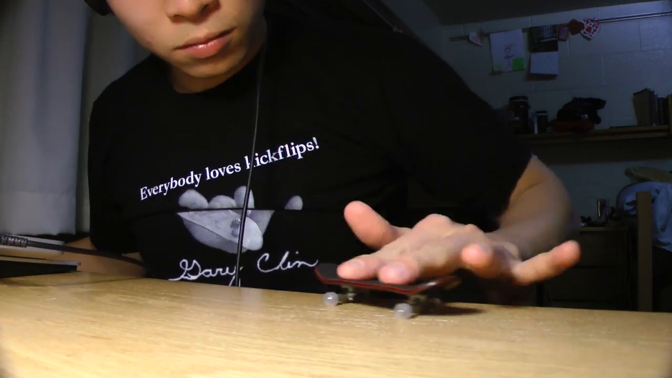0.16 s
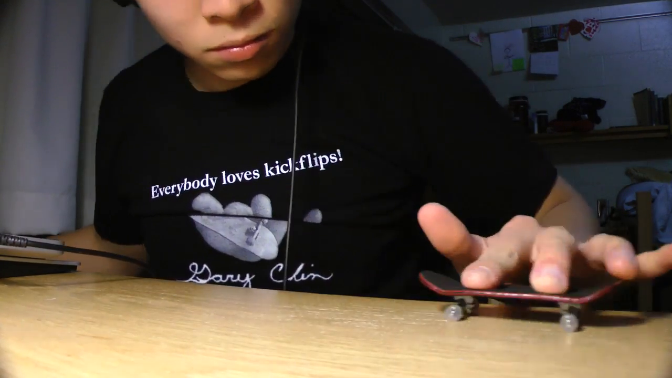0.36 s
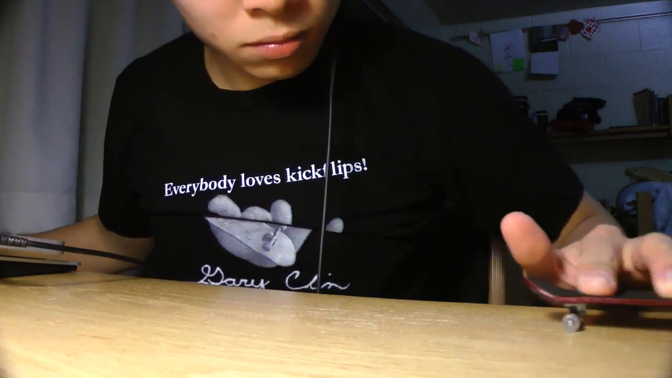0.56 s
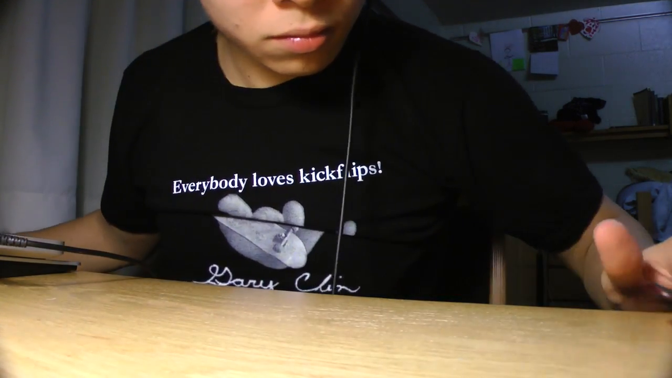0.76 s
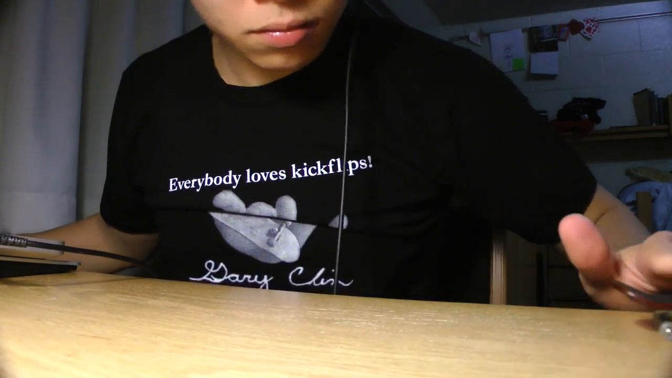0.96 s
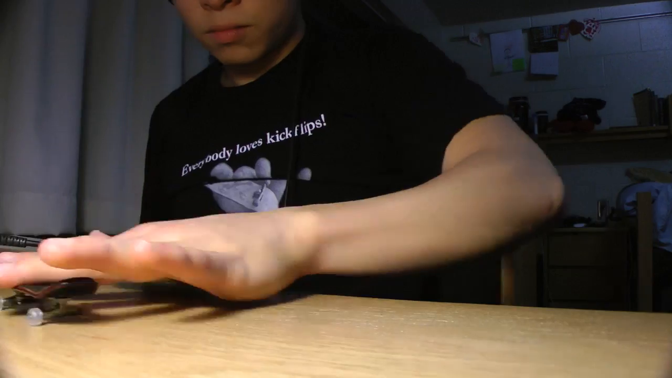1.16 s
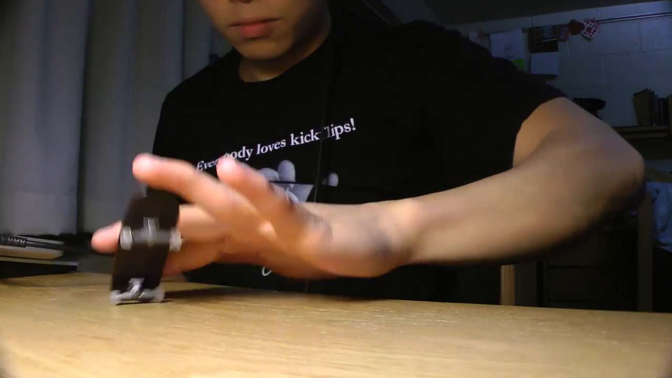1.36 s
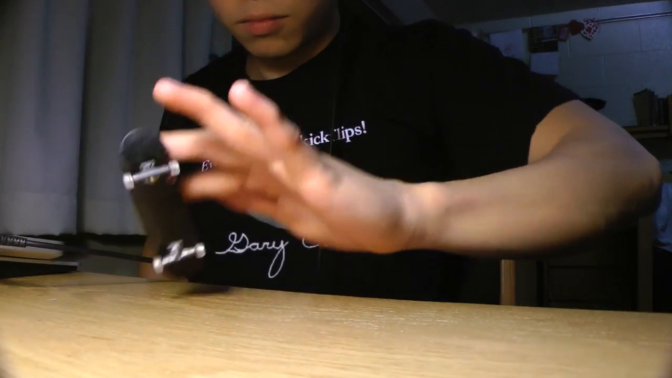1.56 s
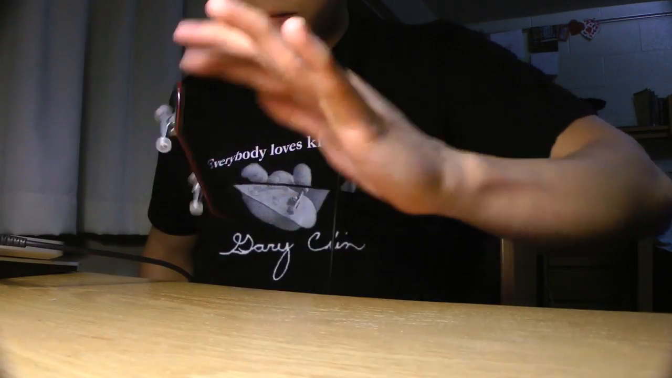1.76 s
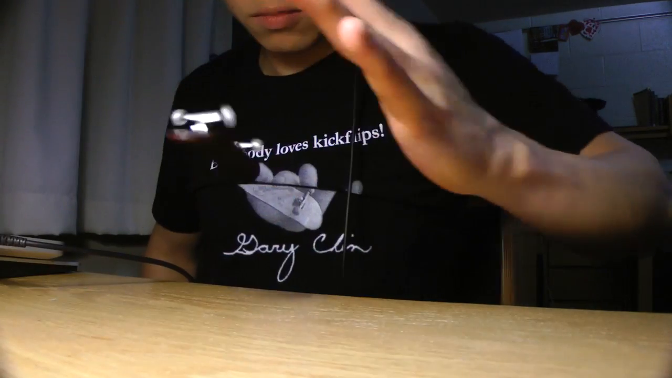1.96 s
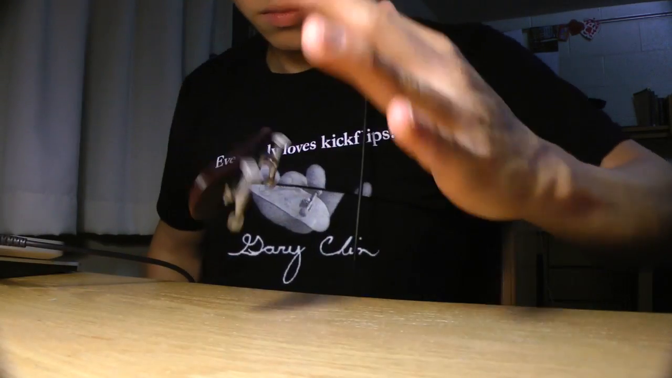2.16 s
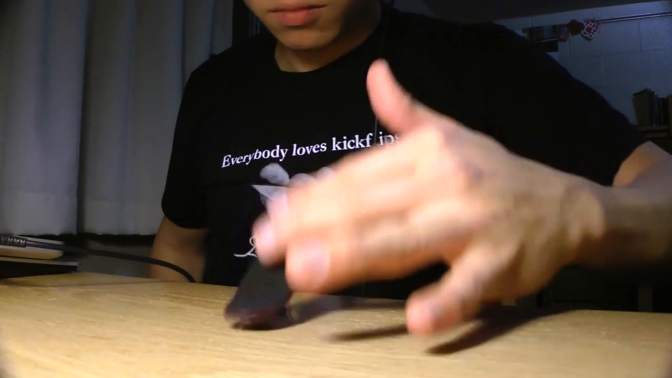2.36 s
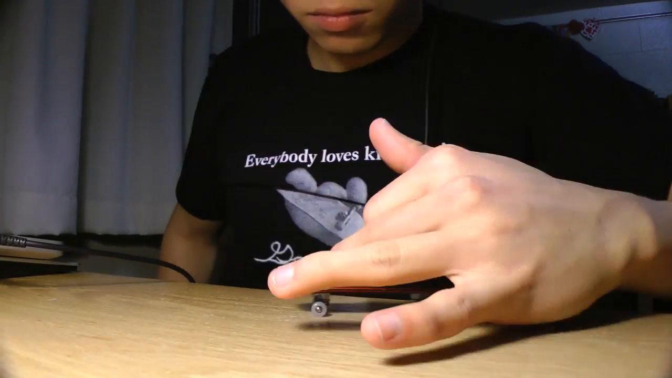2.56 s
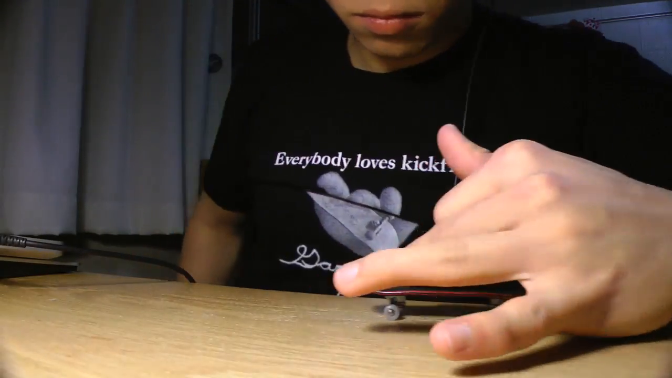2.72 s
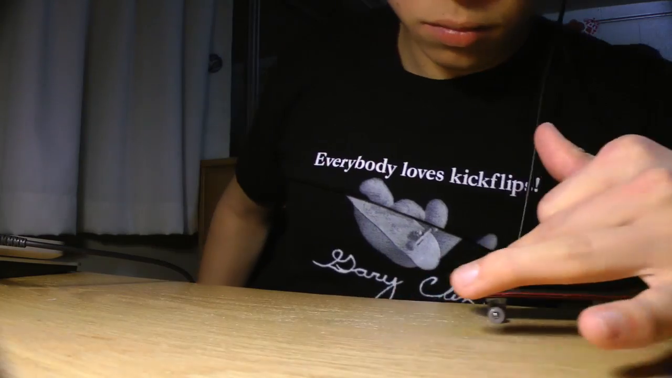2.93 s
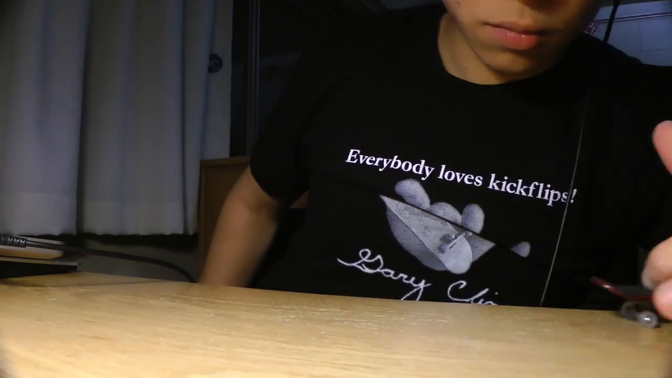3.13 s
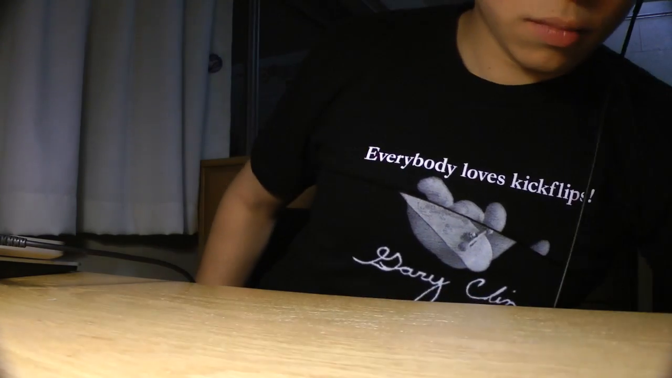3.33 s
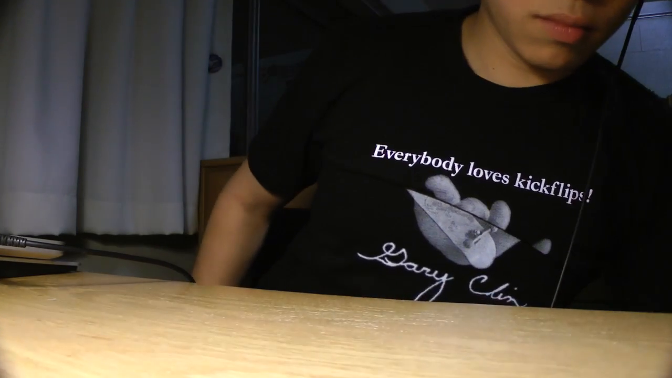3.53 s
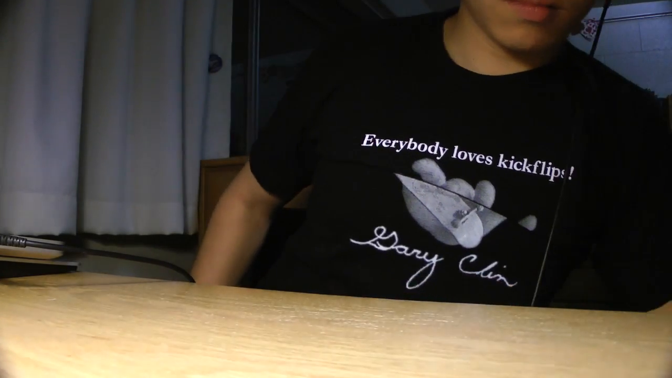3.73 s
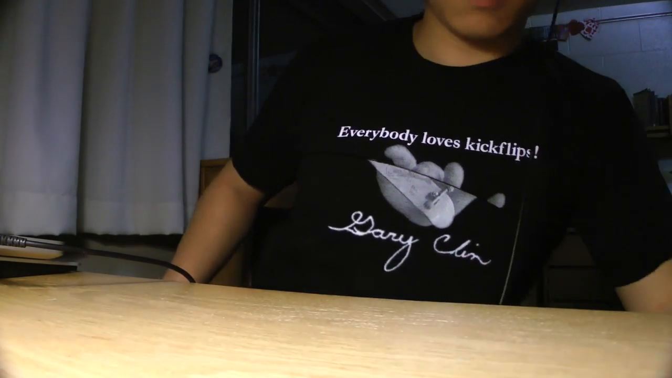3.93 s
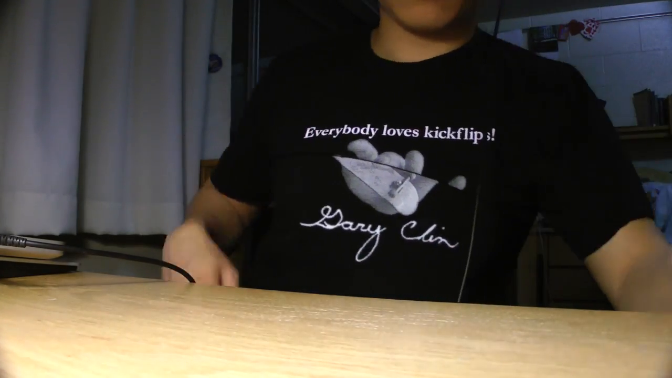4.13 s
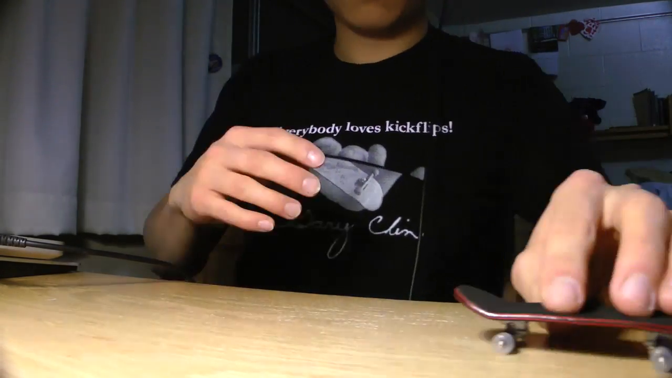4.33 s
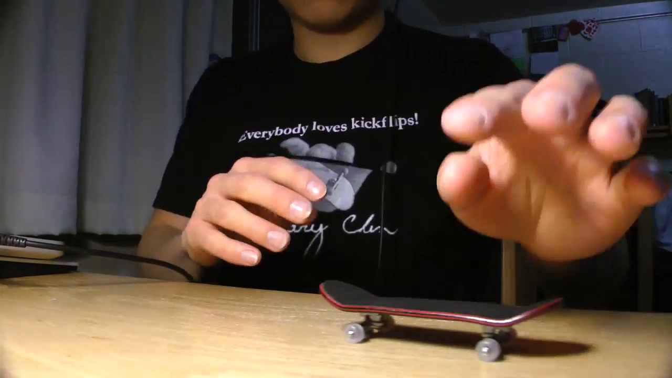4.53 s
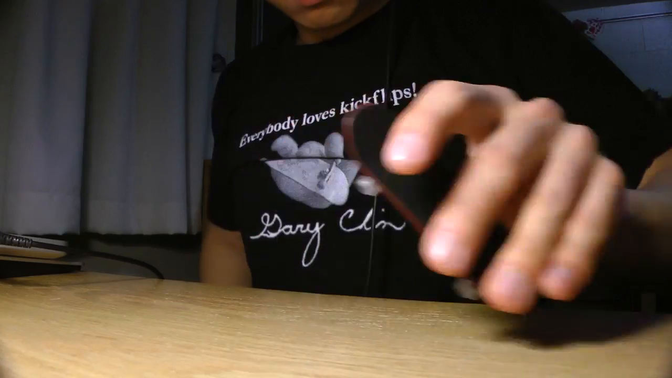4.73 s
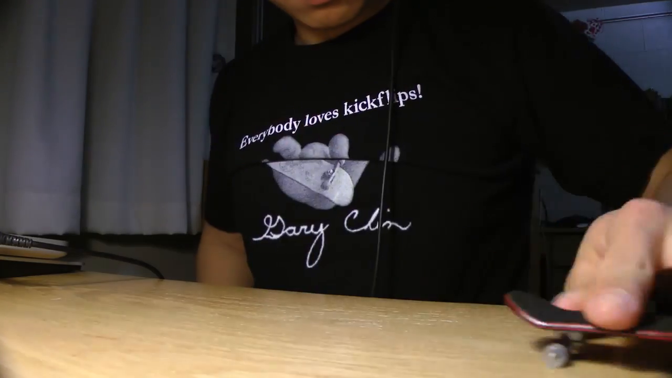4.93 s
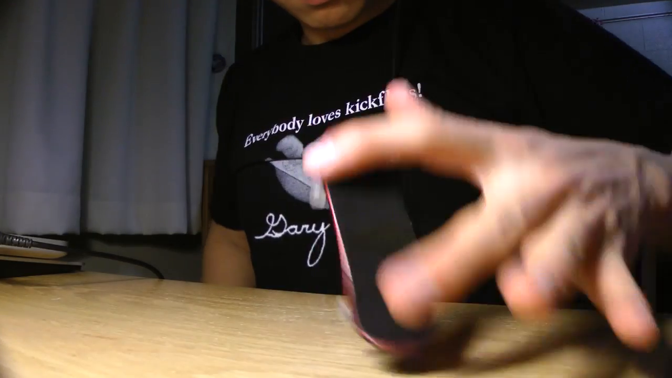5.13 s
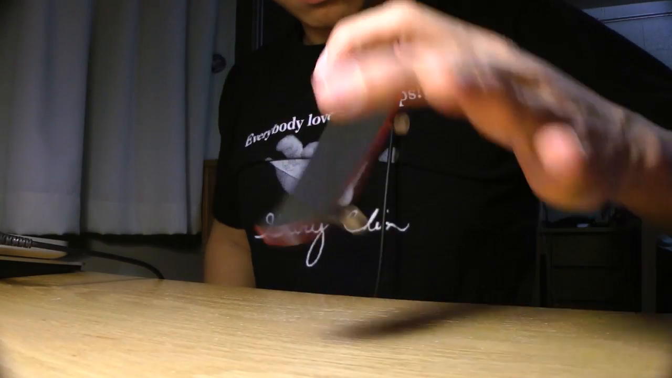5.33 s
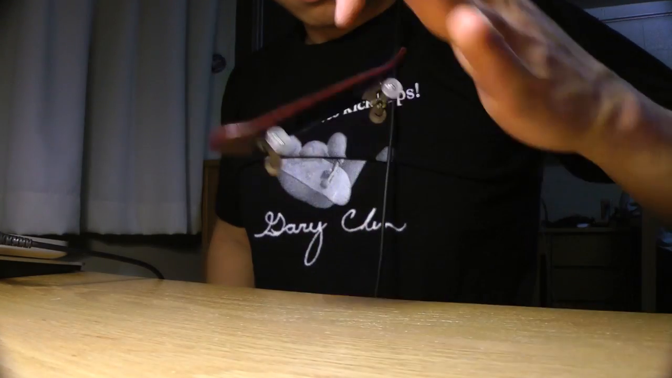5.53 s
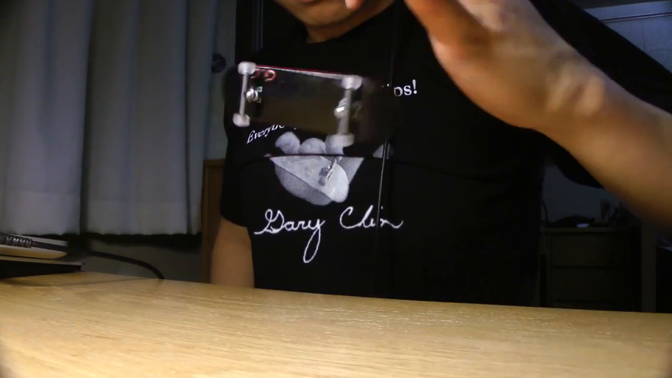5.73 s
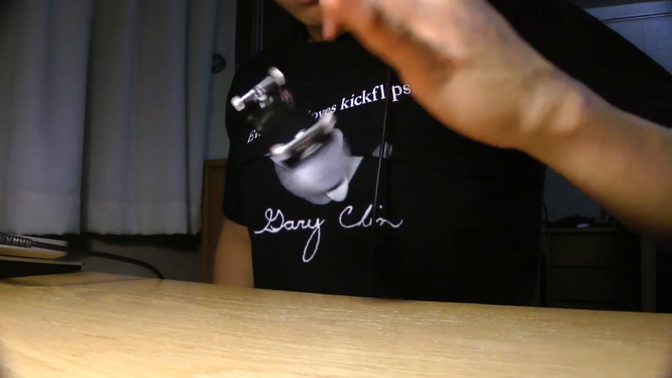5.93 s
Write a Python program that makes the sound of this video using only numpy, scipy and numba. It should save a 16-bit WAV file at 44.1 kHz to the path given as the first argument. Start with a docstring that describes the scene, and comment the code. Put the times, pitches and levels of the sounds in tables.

```python
"""Toy skateboard on a wooden desk

A toy skateboard rolls, pops off its tail, flips and lands, close to a stereo camera in a small quiet room.
Blows and rubbing, made of gritty noise, ring the wheels, axles, deck and desk; fingertips rustle on the rough top.
A machine hums under faint air noise. The flips are in slow motion: all drops about two octaves and stretches."""
import sys
import numpy as np
from scipy import signal
from scipy.fft import rfft, irfft, next_fast_len
from scipy.io import wavfile
from scipy.ndimage import uniform_filter1d, map_coordinates
from numba import njit

SR = 44100
rng = np.random.default_rng(int(sys.argv[2]) if len(sys.argv) > 2 else 0)


def generate_wav(sig):
    """Save sig (samples, or channels by samples) to the path in sys.argv[1] as 16-bit PCM at SR."""
    pcm = np.round(np.clip(np.atleast_2d(sig).T, -1, 1) * 32767).astype(np.int16)
    wavfile.write(sys.argv[1], SR, pcm)


def nominal_scale(level):
    """Amplitude ratio for a level in decibels (scalar or array-like)."""
    x = np.asarray(level, float) / 20
    return 10 ** x


N = 268128
LENGTH = int(4.5 * SR)  # samples of real time at the desk, shorter than playback

# All event tables below give their times in seconds of playback.
# Stretches of playback. Each row: start in seconds, speed (1 is real time).
PLAYBACK = [(0, .253), (.1915, 1), (1.428, .27), (2.508, 1), (5.198, .225)]
# Wheels and deck slap the desk. Each row: start in seconds, clack drive in dB, then relative to it
# the bright click in dB and the deck knock in dB; last the rattle's 60 dB decay in seconds.
SLAPS = [(0.212, -11, -1, -17.5, .081), (0.2206, -12, 8, -9.5, .05), (0.2296, -14.5, 5, 3, .029),
         (0.236, -13, -5.5, 3, 0.026), (1.2328, -35.5, 0.5, -4, .044), (1.2502, -31.5, -4.5, -3, .045),
         (2.5091, -28, -2.5, -10.5, 0.057), (2.5175, -12.5, 3.5, -11.5, .05),
         (2.5222, -18, 4.5, -7.5, .055), (2.5374, -15.5, 8, -5.5, .017), (2.5402, -10, 8, -8.5, .017),
         (2.5437, -8.5, -0.5, -3.5, 0.075), (2.5484, -17, -14.5, -11.5, .059), (3.408, -35, 8, 8, .05),
         (3.454, -11, -2.5, -3.5, .032), (3.53, -29, -3, 6, 0.026), (3.5404, -27, 5, -7.5, .074),
         (3.5465, -22.5, -5, -4.5, .037), (3.711, -38.5, 0.5, -26, .033), (3.7628, -37, 2.5, -12, .05),
         (3.9873, -35.5, -4, -20, .025), (4.0327, -46, 13, -15, .035), (4.339, -20.5, 0.5, -7.5, 0.034),
         (4.3477, -31, 9, 1, 0.051), (4.3714, -35, 1.5, -0.5, .063), (4.394, -25, 3, -3.5, 0.064),
         (4.9222, -29, 6, 1, .03), (4.9709, -23.5, 5.5, -5.5, .064)]
# The tail snaps down and chatters. Each row: start in seconds, clack drive in dB, then relative to it
# the bright click in dB and the desk thump in dB.
TAIL_POPS = [(1.452, -34, -5, -10.5), (1.462, -36, -3.5, -17), (1.5987, -14.5, 9, -5.5),
             (1.608, -18.5, 3.5, -12.5), (1.63, -28.5, 9.5, -8), (1.676, -44, 12.5, 11.5),
             (1.713, -37.5, 5.5, -0.5), (5.284, -44.5, -5, 12.5), (5.325, -14.5, 0, -10),
             (5.337, -29.5, 12.5, 0), (5.35, -33.5, 8, 3), (5.3662, -21, 2, 0), (5.673, -53, -5, -1)]
POP_KNOCK_DB, POP_T60_S = -12, .013
# Loose axles and wheels tick. Each row: start in seconds, clack drive in dB, bright click over it in dB.
LOOSE_TICKS = [(0.185, -53, 20), (0.194, -48.5, 18), (0.8016, -48, -5.5), (0.9274, -56.5, -3.5),
               (1.1034, -52, 1), (1.113, -51, 7), (1.1303, -48, 3), (1.138, -50.5, 4), (1.1603, -43, -2.5),
               (1.2254, -46, 8), (2.6997, -52.5, 3.5), (2.7994, -47.5, -1), (2.955, -63, 7.5),
               (3.6648, -46, -3.5), (3.745, -48.5, 6), (3.7886, -55, 10.5), (4.008, -52.5, 2),
               (4.0828, -67, 12.5), (4.669, -48.5, 5), (4.7716, -65, 2), (4.79, -61, -2),
               (4.8999, -59, 13.5)]
TICK_KNOCK_DB, TICK_THUMP_DB, TICK_T60_S = -8, 4, 0.065
# Glancing scuffs that swell instead of striking. Each row: start in seconds, clack drive in dB,
# then relative to it the bright click in dB and the deck knock in dB.
GLANCING_SCUFFS = [(1.305, -36, -8, -4.5), (1.414, -41, -2, 0.5), (3.357, -33.5, 2.5, 6),
                   (3.381, -33, 2, -8.5), (3.411, -16.5, -5.5, -1), (3.474, -26.5, 3, 2.5),
                   (5.017, -19.5, 4.5, 0), (5.085, -32, -11, 12.5), (5.12, -31.5, 1, 7.5)]
SCUFF_RISE_S, SCUFF_T60_S = 0.0032, .055
STRIKE_RISE_S = .0003
# The desk thumps more when the deck, not the wheels, takes the blow: dB, dB per dB of knock.
THUMP_DB, THUMP_FOLLOWS = -4, 0.14

# The board runs over the desk or through the fingers. Each row: start in seconds, end in seconds,
# wheel hiss drive at first in dB, at last in dB, wood rumble over the hiss in dB.
RUNS_OF_BOARD = [(0.01, 0.19, -75.5, -69.5, -7), (0.3, 0.56, -59, -66, 5.5), (0.56, 0.878, -68, -66, 7),
                 (1.03, 1.101, -59.5, -65.5, 3), (1.109, 1.431, -62, -53, 1.5),
                 (1.434, 1.494, -44.5, -48, 2.5), (1.526, 1.596, -53, -47.5, 2.5),
                 (2.581, 2.616, -39, -44.5, 2.5), (2.661, 2.92, -57.5, -63, 1),
                 (2.92, 3.296, -64.5, -55, 1), (3.323, 3.399, -48, -40.5, -3.5),
                 (3.436, 3.486, -47.5, -40, 0.5), (3.516, 3.573, -50.5, -51.5, 3.5),
                 (3.61, 3.7, -65.5, -62, 1.5), (3.72, 3.958, -63.5, -63.5, -4),
                 (4.003, 4.07, -53.5, -63.5, -16), (4.103, 4.327, -67.5, -63.5, -5),
                 (4.362, 4.673, -51.5, -60, -3), (4.708, 4.804, -72.5, -86.5, -3.5),
                 (4.872, 4.92, -77, -75, -22), (4.977, 5.186, -46, -50.5, -2), (5.2, 5.32, -55, -51, -1)]
RUN_RISE_DB_PER_S, RUN_FALL_DB_PER_S = 380, 400
# Fingertips brush the rough top. Each row: time of the peak in seconds, peak drive in dB.
FINGER_BRUSHES = [(0.2, -61.5), (0.31, -54.5), (0.83, -71), (1.03, -69.5), (1.19, -67), (1.27, -56),
                  (1.42, -53), (1.585, -62.5), (3.34, -45), (3.383, -40.5), (3.49, -37.5), (3.57, -51.5),
                  (3.74, -56), (3.8, -65.5), (4.019, -56), (4.37, -63.5), (4.6, -63), (4.695, -62.5),
                  (4.931, -63), (5.05, -53), (5.164, -50.5)]
BRUSH_DB_PER_S = 351.5  # how fast a brush swells and fades
RESTING_DB = -14  # resting fingers, relative to the wheel hiss
LOADED_HZ = 1640  # under rolling wheels the deck's higher modes stay quiet above this
# Colour of the fingertip rustle. Each row: frequency in Hz, relative density in dB per Hz.
RUSTLE_COLOUR = [(3820, -29.5), (6500, 2), (7190, -14.5), (15100, -25.5), (16300, -28), (16500, -60.5)]

# Resonances of the wheels. Each row: centre in Hz, width in Hz, relative level in dB.
WHEEL_MODES = [(2455, 330, -8), (3050, 220, 0), (3246, 350, 0), (3720, 430, 1.5), (4110, 580, -1),
               (4830, 820, -5)]
# Resonances of the steel axles and nuts. Each row: centre in Hz, width in Hz, relative level in dB.
AXLE_MODES = [(5500, 370, 1), (6100, 320, 1.5), (6920, 560, -3), (7970, 900, -6.5), (8900, 740, -4.5),
              (11920, 4200, -15.5), (13500, 1100, -27)]
# Resonances of the wooden deck. Each row: centre in Hz, width in Hz, relative level in dB.
DECK_MODES = [(789.6, 47, 2), (1090, 97, 0.5), (1420, 84, 3.5), (1719, 130, 6.6), (2017, 380, 2.8)]
# Resonances of the desk top. Each row: centre in Hz, width in Hz, relative level in dB.
DESK_MODES = [(45.7, 55, -18), (116, 83, -3), (165, 91, 0.5), (243, 47, -2.5), (366.6, 40, 3),
              (577, 37, -3.5), (715, 57, -7)]
# The hollow between hand, board and desk favours one band for each grip.
# Each row: start in seconds, centre in Hz at real speed, lift in dB.
GRIP_HOLLOWS = [(0, 4380, 8), (.36, 4100, 10), (.97, 3830, 1), (1.19, 2490, 11), (1.46, 3540, 5.5),
                (1.57, 6470, 3), (2.47, 3890, 6), (3.35, 6170, 7), (3.405, 5600, 9), (3.445, 3900, 6),
                (3.75, 3300, 5), (3.8, 4420, 4), (3.97, 2900, 8), (4.02, 6240, 9), (4.09, 4440, 5.5),
                (4.325, 3650, 12), (4.352, 2010, 10), (4.459, 3840, 7), (4.7, 3830, 1), (4.88, 1830, 12),
                (4.964, 3070, 12.5), (4.985, 1860, 11), (5.014, 3000, 9.5), (5.045, 2235, 9.5),
                (5.21, 5325, 11.5), (5.4, 5010, 13.5)]
HOLLOW_WIDTH_HZ, REGRIP_S = 230, .012

# Decay of the small room. Each row: frequency in Hz, 60 dB decay in seconds.
ROOM_DECAY = [(100, .3), (1000, 0.15), (4000, 0.14), (12000, 0.1)]
LATE_DB, LATE_LONGER = -13, 2.6  # the far corners answer weaker and longer (times the decay)
# Colour of the still room's air. Each row: frequency in Hz, relative density in dB per Hz.
AIR_COLOUR = [(15, -41), (30, -12.5), (60, -9.5), (100, 0), (200, 1.5), (320, -12), (500, -19), (1000, -27),
              (1300, -33), (5000, -32), (9300, -37.5), (16500, -53)]
AIR_DB = -63  # rms of the air noise ahead of the microphone ports
# Hum of the machine. Each row: frequency in Hz, drive in dB.
MACHINE_HUM = [(119.4, -54), (195, -70), (107, -78)]
HUM_LEFT = 0.48  # the machine stands to the left: share of its hum in the difference between the ports

# The desk's reflection cancels one band at the microphone. In order: centre in Hz, width in Hz, depth 0 to 1.
DESK_DIP = (1555, 110, .9)
# Stereo width. Each row: frequency in Hz, gain in dB on the difference between the ports.
PORT_WIDTH = [(60, 4.5), (110, -5.5), (200, -5.5), (380, -7.5), (700, -0.5), (1290, -4.5), (2380, -4),
              (4400, -17), (8120, -9.5), (15000, -1)]
# Balance of the two ports over frequency. Each row: frequency in Hz, left over right in dB.
PORT_BALANCE = [(60, 1), (180, 3), (550, 0.5), (1650, 1), (4970, -0.93), (15000, 1)]
# Where the board is, heard as the balance of the whole sound. Each row: time in seconds, left over right in dB.
BOARD_PLACE = [(0, 0.5), (.6, 0.7), (1.2, 2), (1.7, 1.5), (2.5, 1.5), (3, 0.24), (3.5, 1.5), (4.1, 0),
               (4.4, -0.4), (5.4, 0), (6.1, -1)]
TOP_HZ = 19000  # the camera's treble has faded out here


def blows():
    """Each blow is a short noisy force that rings wheels, axles, deck and desk; sharp ones begin with a crack."""
    t = np.arange(SR // 8) / SR
    force = np.zeros((4, 2, LENGTH + len(t)))  # body x (shared, differing between the ports)
    chatter = gritty(grit_db=2.5, rate=700)
    rise = 1 - np.exp(-t / STRIKE_RISE_S)
    swell = (1 - np.exp(-t / SCUFF_RISE_S)) ** 2
    crack = 0.45 * rise * nominal_scale(-60 * t / 0.0017)  # the blow itself is over in two milliseconds
    for s, db, click_db, knock_db, thump_db, t60, sharp in strikes():
        at = round(real_time(s) * SR)
        rattle = (rise if sharp else swell) * nominal_scale(-60 * t / max(t60, .005))
        force_shape = sharp * crack + rattle
        shake = force_shape * chatter[:, at:at + len(t)]
        # the blow's energy is set, its grain is chance
        shake *= np.linalg.norm(force_shape) / np.linalg.norm(shake, axis=1, keepdims=True)
        shake[0, 0] += sharp * 7.0  # the first contact
        body_db = db + np.array([-7, click_db - 10.5, knock_db - 9.5, thump_db - 8.5])
        force[..., at:at + len(t)] += nominal_scale(body_db)[:, None, None] * shake
    bodies = (WHEEL_MODES, AXLE_MODES, DECK_MODES, DESK_MODES)
    return sum(filtered(f[:, :LENGTH], body(modes)) for f, modes in zip(force, bodies))


def strikes():
    """Every contact as (s, clack, click, knock, thump dB, rattle t60 s, sharp or not)."""
    def thump(knock_db):
        return THUMP_DB + THUMP_FOLLOWS * knock_db

    slaps = [(s, db, click, knock, thump(knock), t60, True) for s, db, click, knock, t60 in SLAPS]
    pops = [(s, db, click, POP_KNOCK_DB, low, POP_T60_S, True) for s, db, click, low in TAIL_POPS]
    ticks = [(s, db, click, TICK_KNOCK_DB, TICK_THUMP_DB, TICK_T60_S, True) for s, db, click in LOOSE_TICKS]
    scuffs = [(s, db, click, knock, thump(knock), SCUFF_T60_S, False)
              for s, db, click, knock in GLANCING_SCUFFS]
    return slaps + pops + ticks + scuffs


def rolling():
    """Wheels run over the wood grain and shake the same bodies; fingertips rustle on the rough top."""
    hiss_db, rumble_db, rustle_db = contact()
    bumps = wobble(40)  # uneven wheels and wood load all layers together
    grain = gritty(grit_db=2, rate=200, knots=3., per_s=200)

    def soft(hz):  # a rolling contact is too slow to excite the top octave
        return 1 / (1 + 1j * hz / 12000) ** 2

    def wheels_and_axles(hz):
        return soft(hz) * (body(WHEEL_MODES)(hz) + nominal_scale(-4.5) * body(AXLE_MODES)(hz))

    def deck_and_desk(hz):
        loaded_deck = nominal_scale(3) * body(DECK_MODES)(hz) / (1 + (hz / LOADED_HZ) ** 6) ** .5
        return soft(hz) * (loaded_deck + nominal_scale(-0.5) * body(DESK_MODES)(hz))

    hiss = filtered(grain, wheels_and_axles)
    wood = filtered(grain, deck_and_desk)
    rustle = unit(filtered(gritty(grit_db=8.0, rate=130), lambda hz: nominal_scale(along(RUSTLE_COLOUR, hz))))
    layers = nominal_scale(hiss_db - 2.0 + 0.65 * bumps) * hiss
    layers += nominal_scale(rumble_db + 0.39 * bumps) * wood
    layers += nominal_scale(rustle_db + 1.0 * bumps) * rustle
    return drifting(layers, patchy_db=1.5)


def contact():
    """Hiss, rumble and rustle drives in dB: the loudest run or brush rules at each moment."""
    start, end, first_db, last_db, wood_db = np.transpose(RUNS_OF_BOARD)
    runs = peaked(start, end, first_db, last_db, RUN_RISE_DB_PER_S, RUN_FALL_DB_PER_S)
    s, db = np.transpose(FINGER_BRUSHES)
    brush = peaked(s, s, db, db, BRUSH_DB_PER_S, BRUSH_DB_PER_S).max(axis=0)
    hiss = runs.max(axis=0)
    rumble = (runs + wood_db[:, None]).max(axis=0)
    rustle = np.maximum(brush, hiss + RESTING_DB)
    return [np.interp(np.arange(LENGTH), 32 * np.arange(len(v)), v) for v in (hiss, rumble, rustle)]


def peaked(start, end, first_db, last_db, rise, fall):
    """Level in dB that climbs to a ramp and sinks after it, one row per event, every 32 samples."""
    t = np.arange(0, LENGTH, 32) / SR
    start, end = real_time(start)[:, None], real_time(end)[:, None]
    progress = np.clip((t - start) / (end - start + 1e-6), 0, 1)
    ramp = first_db[:, None] + (last_db - first_db)[:, None] * progress
    return ramp - rise * np.clip(start - t, 0, None) - fall * np.clip(t - end, 0, None)


def drifting(pair, patchy_db):
    """As the board moves, bands of its rolling slowly swell and fade."""
    z = signal.stft(pair, nperseg=512)[2]
    field = uniform_filter1d(rng.standard_normal(z.shape[1:]), 4, 0)  # over frequency
    field = uniform_filter1d(field, 24, 1)  # over time
    return signal.istft(z * nominal_scale(patchy_db * unit(field)), nperseg=512)[1][:, :LENGTH]


def hollow(board):
    """The hollow under the hand resonates; each new grip shifts the band that stands out."""
    s, *cols = np.transpose(GRIP_HOLLOWS)
    grip = np.searchsorted(real_time(s), np.arange(LENGTH) / SR, side="right") - 1
    glide = max(round(REGRIP_S * SR), 1)
    hz, lift_db = [uniform_filter1d(c[np.maximum(grip, 0)], size=glide) for c in cols]
    band = swept(board, 2 * np.pi * hz / SR, np.exp(-np.pi * HOLLOW_WIDTH_HZ / SR))
    return board + (nominal_scale(lift_db) - 1) * band


@njit
def swept(x, turn, radius):
    """A two-pole resonance of peak gain 1 whose pitch (radians a sample) moves."""
    y = np.zeros_like(x)
    for c in range(x.shape[0]):
        for i in range(2, x.shape[1]):
            drive = (1 - radius ** 2) / 2 * (x[c, i] - x[c, i - 2])
            y[c, i] = drive + 2 * radius * np.cos(turn[i]) * y[c, i - 1] - radius ** 2 * y[c, i - 2]
    return y


def room(x):
    """The walls answer with a noise tail in which each frequency dies at its own speed."""
    hz, t, z = signal.stft(rng.standard_normal((2, SR // 2)), SR, nperseg=256)
    t60 = along(ROOM_DECAY, hz)[:, None]
    decay = nominal_scale(-60 * t / t60) + nominal_scale(LATE_DB - 60 * t / LATE_LONGER / t60)
    tail = signal.istft(z * decay, SR, nperseg=256)[1]
    tail /= np.linalg.norm(tail[0])
    delayed = np.pad(x, (250, 0))  # samples on the way to the walls and back
    return signal.fftconvolve(delayed[None], tail, axes=1)[:, :LENGTH]


def still_room():
    """Faint air noise under the slightly wavering hum of a machine, a few sines."""
    air = unit(filtered(rng.standard_normal((2, LENGTH)), lambda hz: nominal_scale(along(AIR_COLOUR, hz))))
    t = np.arange(LENGTH) / SR
    drift = 0.16 * wobble(16)  # radians
    hum = sum(nominal_scale(db - AIR_DB + 2.5) * np.sin(2 * np.pi * hz * t + drift) for hz, db in MACHINE_HUM)
    air += np.array([[1], [HUM_LEFT]]) * nominal_scale(0.58 * wobble(10.0)) * hum
    return nominal_scale(AIR_DB) * air


def to_ports(pair):
    """Left and right microphone ports from what both share and what differs between them."""
    hz0, width, depth = DESK_DIP

    def split(hz):
        dip = 1 - depth * 1j * hz * width / (hz0 ** 2 - hz * hz + 1j * hz * width)
        return np.array([dip, nominal_scale(along(PORT_WIDTH, hz))])

    shared, side = filtered(pair, split)
    ports = np.array([shared + side, shared - side])
    return filtered(ports, lambda hz: nominal_scale(along(PORT_BALANCE, hz) * [[.5], [-.5]]))


def gritty(grit_db, rate, knots=0., per_s=120):
    """Two unrelated noises whose size jumps with the wood grain; knots adds knocks over harder fibres."""
    noise = nominal_scale(grit_db * wobble(rate)) * rng.standard_normal((2, LENGTH))
    chance = rng.random(LENGTH) * SR / per_s
    noise[0] -= knots * np.log(np.clip(chance, 1e-9, 1))  # rare, with exponential sizes
    return unit(noise)


def body(modes):
    """Causal sum of resonances, scaled so that white noise keeps its rms."""
    def response(f):
        rings = ((-1) ** k * nominal_scale(db) * 1j * f * w / (c * c - f * f + 1j * f * w)
                 for k, (c, w, db) in enumerate(modes))
        return unit_gain(sum(rings))

    return response


def unit_gain(response):
    """Mean power gain 1."""
    return response / np.sqrt(np.mean(abs(response) ** 2))


def unit(x):
    """Rms 1."""
    return x / np.sqrt(np.mean(x ** 2) + 1e-20)


def along(points, hz):
    """(Hz, value) points read on a log axis."""
    f, v = np.transpose(points)
    return np.interp(np.log(hz + 1), np.log(f + 1), v)


def wobble(rate):
    """A smooth random curve, rate knots a second."""
    knots = rng.standard_normal(int(LENGTH * rate / SR) + 4)
    return map_coordinates(knots, [np.arange(LENGTH) * rate / SR])


def filtered(x, response):
    """x with its spectrum multiplied by a complex response of frequency."""
    m = next_fast_len(LENGTH + SR // 6)
    return irfft(rfft(x, m) * response(np.fft.rfftfreq(m, 1 / SR)), m)[..., :LENGTH]


def real_time(s):
    """Seconds that have passed at the desk after s seconds of playback."""
    start, speed = np.transpose(PLAYBACK)
    knots = np.append(start, N / SR + 1)
    return np.interp(s, knots, np.append(0, np.cumsum(np.diff(knots) * speed)))


def curves(rows):
    """Columns given in playback time, read at every sample of real time."""
    s, *cols = np.transpose(rows)
    return [np.interp(np.arange(LENGTH) / SR, real_time(s), c) for c in cols]


def scene():
    """The board, its echo and the still room at the two ports, in real time."""
    hits = blows()
    echo = nominal_scale(-11.0) * room(hits[0])
    board = hollow(hits + echo + rolling())
    ports = to_ports(board + still_room())
    ports = ports * nominal_scale(curves(BOARD_PLACE)[0] * [[.5], [-.5]])
    return np.pad(ports, ((0, 0), (0, N - LENGTH)))


def played(sound, start, end, speed, margin=512):
    """One stretch of playback: the sound read at the given speed, pitch and pace together."""
    first, count = round(real_time(start) * SR), round(end * SR) - round(start * SR)
    if speed == 1:
        return sound[:, first:first + count]
    part = np.pad(sound, ((0, 0), (margin, margin)))[:, first:first + round(count * speed) + 2 * margin]
    part = part * signal.windows.tukey(part.shape[1], margin / part.shape[1])
    skip = round(margin / speed)
    return signal.resample(part, count + 2 * skip, axis=1)[:, skip:][:, :count]


def low_pass(x):
    """Removes everything above the highest recorded frequency."""
    return signal.sosfilt(signal.butter(12, 16970, fs=SR, output="sos"), x)


def record(dry):
    """The camera squeezes the loudest peaks and limits the band; playback changes speed."""
    dry = dry[:, :LENGTH]
    squeezed = dry / (1 + abs(dry / .75) ** 3) ** (1 / 3)
    # the treble fades over the last 5 kHz below the top
    sound = filtered(squeezed, lambda hz: np.cos(np.pi / 2 * np.clip((hz - TOP_HZ) / 5000 + 1, 0, 1)))
    ends = [s for s, _ in PLAYBACK[1:]] + [N / SR]
    parts = [played(sound, s, end, speed) for (s, speed), end in zip(PLAYBACK, ends)]
    return low_pass(np.concatenate(parts, axis=1))


dry = scene()
out = record(dry)
generate_wav(out)
```